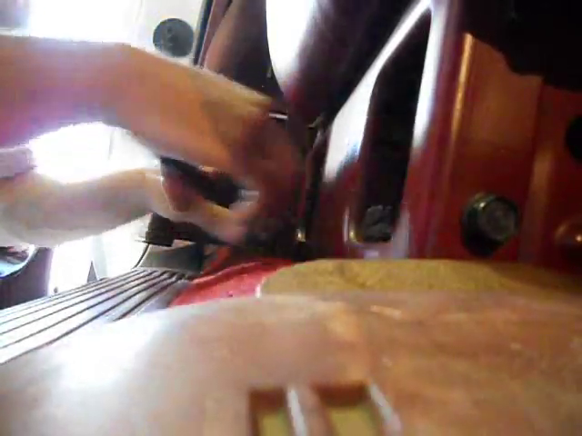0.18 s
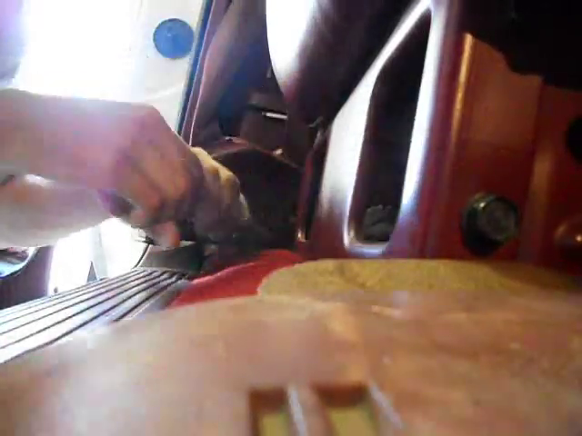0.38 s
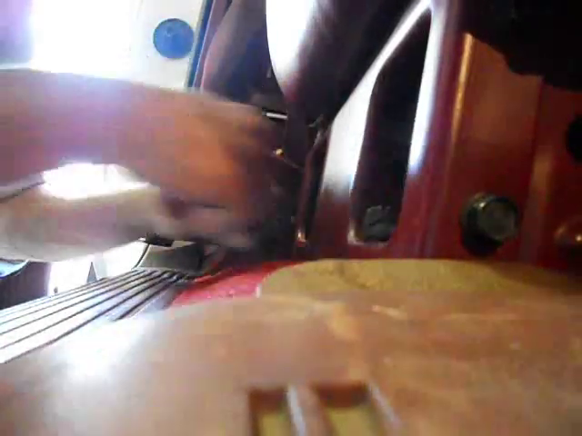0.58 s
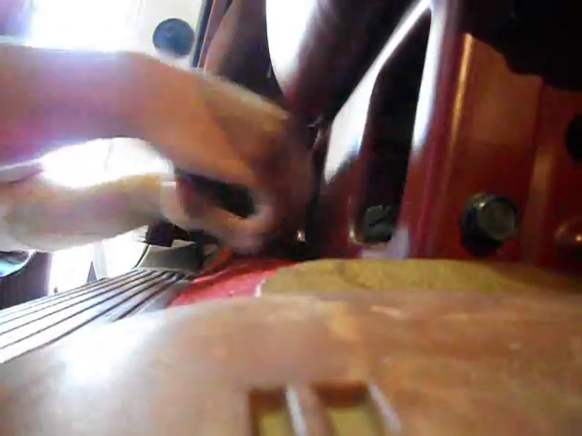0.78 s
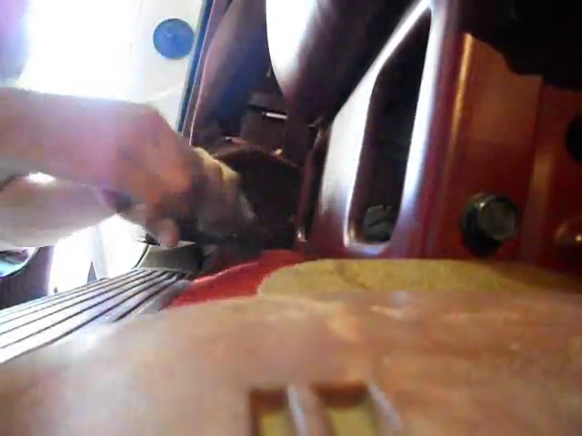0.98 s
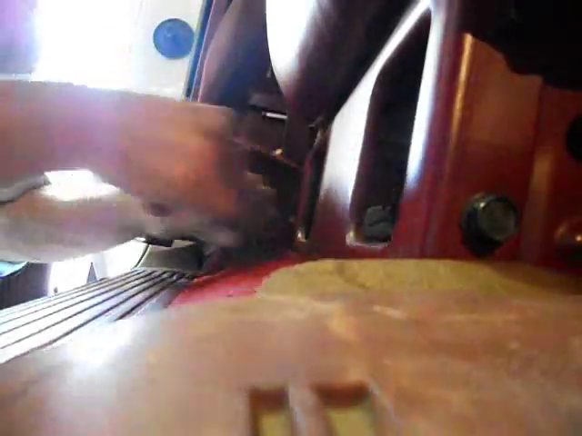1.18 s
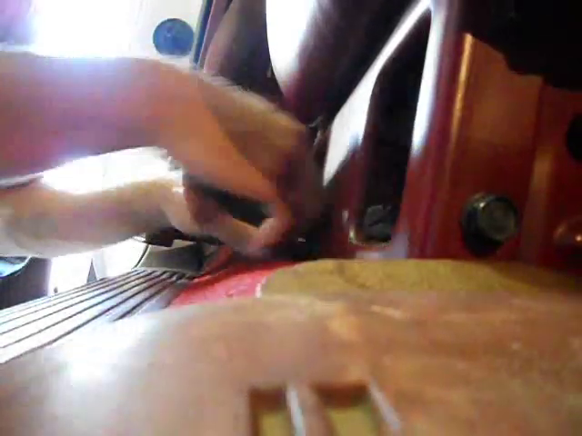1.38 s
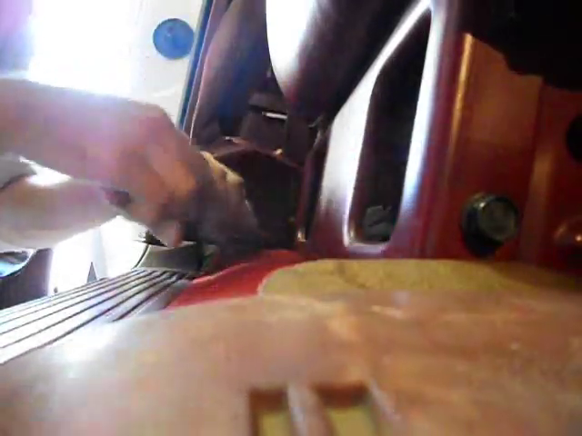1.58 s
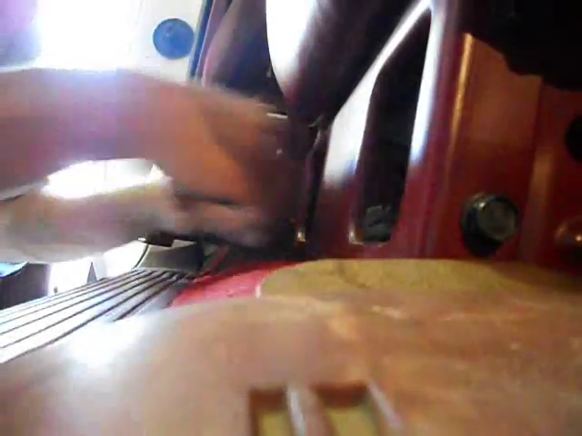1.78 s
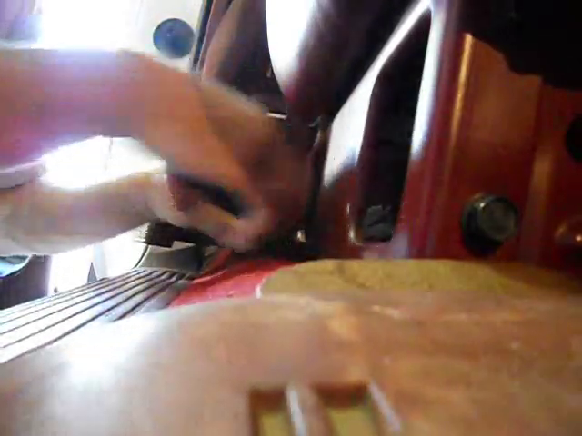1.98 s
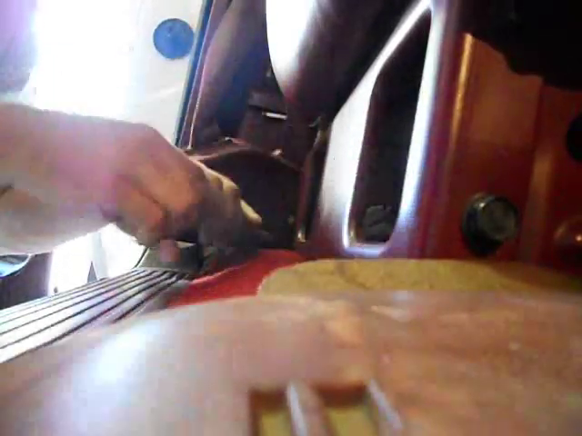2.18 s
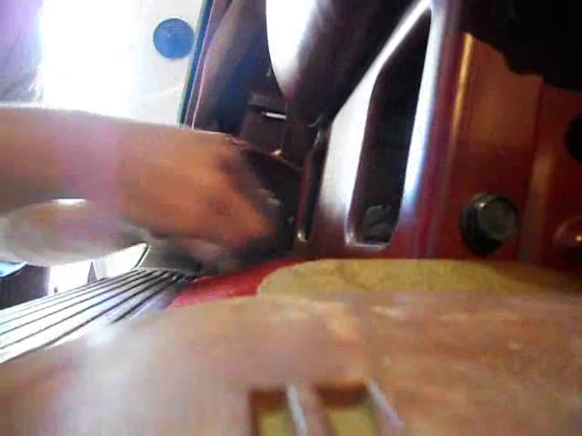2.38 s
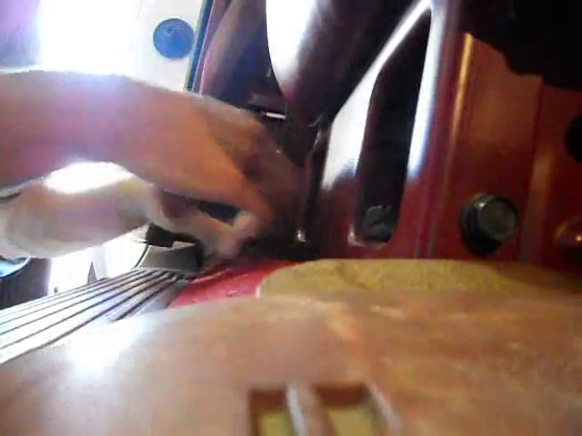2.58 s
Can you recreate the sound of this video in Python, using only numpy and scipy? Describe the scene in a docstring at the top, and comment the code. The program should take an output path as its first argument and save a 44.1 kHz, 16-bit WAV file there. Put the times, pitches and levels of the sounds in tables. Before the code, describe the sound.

Locking pliers wrench a rusty bolt in a vehicle, giving stuttering creaks, panel thuds and sharp clacks.

```python
"""Pliers on a rusted bolt

Locking pliers turn a rusted bolt in short strokes inside a vehicle. The threads stick and slip: each slip
is rough contact noise that shakes decaying panel and steel modes. The pliers clack as short noise bands,
rust grinds as a stream of tiny random impulses, and one dry scrape slides by as treble noise.
Camera hiss, a hum, two thin whines and a low rumble lie underneath.
"""
import sys
import numpy as np
from scipy import signal
from scipy.fft import rfft, irfft
from scipy.io import wavfile
from scipy.ndimage import uniform_filter1d

SR = 44100
rng = np.random.default_rng(int(sys.argv[2]) if len(sys.argv) > 2 else 0)


def persist_wave(psi):
    """Save psi, clipped to +-1, as 16-bit WAV."""
    counts = np.round(np.clip(psi, -1, 1) * 32767).astype(np.int16)
    wavfile.write(sys.argv[1], SR, np.atleast_2d(counts).T)


N = 114660  # length [samples]

# contact of one thread slip: fade time constant and rise [s]
SLIP_S, SLIP_RISE_S = 0.0024, 0.0022


def undb(db):
    """Turn dB into gain."""
    return 10 ** (np.asarray(db) / 20)


def unit(x):
    """Scale to rms 1."""
    return x / np.sqrt(np.mean(x ** 2))


def curve(table, column):
    """Join a table column by straight lines in time."""
    times = [row[0] for row in table]
    values = [row[column] for row in table]
    return np.interp(np.arange(N) / SR, times, values)


def add(out, start_s, x, peak_db):
    """Lay one blow into the track at its peak level."""
    start = int(start_s * SR)
    x = x[:N - start]
    out[start:start + len(x)] += x * undb(peak_db) / np.abs(x).max()


def coloured(gain):
    """Noise of rms 1, shaped by a gain for each frequency."""
    hz = np.maximum(np.arange(N // 2 + 1) * SR / N, 1.0)
    spectrum = rfft(rng.standard_normal(N)) * gain(hz)
    return unit(irfft(spectrum, N))


def burst(low_hz, high_hz, t60_s, rise_s=0, size=6000):
    """Densely packed, quickly damped modes, heard as a noise band that builds and dies away."""
    band = signal.butter(2, [low_hz, min(high_hz, 0.45 * SR)], "bandpass", fs=SR, output="sos")
    noise = unit(signal.sosfilt(band, rng.standard_normal(size)))
    t = np.arange(1, size + 1) / SR
    decay = np.exp(-np.log(1000) * t / t60_s)
    rise = t / np.maximum(t, rise_s)
    return noise * decay * rise


def chatter(length_s, rise_s=1e-5, push_s=0, size=3000):
    """Rough contact: spiky noise builds to a jolt and fades; a soft contact smooths it."""
    t = np.arange(size) / SR
    spikes = rng.standard_normal(size) ** 3
    contact = 0.16 * spikes * np.exp(-t / length_s) * np.minimum(t / rise_s, 1)
    contact[int(rise_s * SR)] = 1  # the jolt
    if push_s:
        contact = signal.lfilter([1], [1, -np.exp(-1 / (push_s * SR))], contact)
    return contact


def ring(modes, favour_hz=None, size=6000):
    """One blow's answer: decaying sines, each a little detuned and uneven."""
    scatter_db, detune = 1, 0.015  # spread of level [dB] and of pitch [fraction]
    favour_db, favour_oct = 8, 0.88  # boost [dB] around the favoured pitch and its reach [octaves]
    hz, db, t60_s = np.array(modes).T
    chance = rng.standard_normal((3, len(hz)))
    db = db + scatter_db * chance[0]
    if favour_hz:
        db = db + favour_db * np.exp(-(np.log2(hz / favour_hz) / favour_oct) ** 2)
    t = np.arange(size)[:, None] / SR
    sines = np.sin(2 * np.pi * hz * (1 + detune * chance[1]) * t)
    waves = sines * 1000.0 ** (-t / t60_s)
    return waves @ (undb(db) * np.sign(chance[2]))  # random polarity


def panel(contact, favour_hz=None):
    """A contact shakes the panel's clear modes and its denser band of damped ones."""
    # clear modes of the body panel: (pitch [Hz], relative level [dB], t60 [s])
    panel_modes = [(167, -13.5, 0.095), (202.4, -3.5, 0.082), (238.8, 0, 0.036), (328, -3.5, 0.025),
                   (462.7, -1.5, 0.041), (601, 1.5, 0.034), (663, 2, 0.012), (776, 2, 0.018),
                   (953, -3.5, 0.029), (1190, -11.5, 0.032), (1293, -11, 0.045), (1570, -28, 0.013)]
    dense_db = -7.5
    clear = ring(panel_modes, favour_hz)
    dense = burst(480, 1190, t60_s=0.046) * undb(dense_db) * np.abs(clear).max() / 2
    return signal.fftconvolve(contact, clear + dense)


def steel(length_s, rise_s=1e-4):
    """Contact rattles a few clear steel modes, over a dense damped band."""
    # clear modes of the steel: (pitch [Hz], relative level [dB], t60 [s])
    steel_modes = [(2250, -2.5, 0.03), (4350, 8, 0.038), (5850, -9.5, .04)]
    band_db = -1.5
    clear = signal.fftconvolve(chatter(length_s, rise_s), ring(steel_modes))
    band = burst(1050, 5360, t60_s=0.057, rise_s=rise_s, size=len(clear))
    return clear / np.abs(clear).max() + undb(band_db) * band


def dull(x):
    """Rust softens the treble of a contact: a gentle low-pass."""
    rust_hz = 3080
    return signal.lfilter(*signal.butter(2, rust_hz, fs=SR), x)


def tone(hz):
    """A sine of rms 1."""
    return np.sqrt(2) * np.sin(2 * np.pi * hz * np.arange(N) / SR)


def rumble():
    """Low rumble through the body: a narrow band of noise that swells and sinks."""
    # rumble loudness: (time [s], level [dB])
    rumble_level = [(0, -56.5), (.45, -45), (.75, -56.5), (1.2, -65.5), (1.35, -48.5), (1.9, -43),
                    (2.6, -63.5)]
    centre_hz, width_hz = 49, 39
    noise = coloured(lambda f: np.exp(-((f - centre_hz) / width_hz) ** 2))
    return undb(curve(rumble_level, 1)) * noise


def background():
    """Camera hiss with thin whines and a hum, sinking after loud clacks, plus low rumble."""
    # hiss colour: (frequency [Hz], relative density [dB per Hz])
    hiss_colour = [(70, -32.5), (110, -6.5), (250, -9.5), (600, -18.5), (2000, -21.5), (7700, -26.5),
                   (15900, -33)]
    # thin whines: (pitch [Hz], level relative to the hiss [dB])
    whines = [(7854, -12.5), (14169, -14)]
    # moving levels: (time [s], hiss level [dB], hum level [dB])
    levels = [(0, -47.5, -48.5), (.632, -45.5, -45.5), (.645, -49.5, -77), (.9, -58, -60),
              (1.27, -58, -63.5), (1.45, -49, -49), (1.85, -45, -46), (1.9, -48.5, -56), (2.6, -54.5, -57)]
    hum_hz = 406
    hz, db = np.array(hiss_colour).T
    hiss = coloured(lambda f: undb(np.interp(np.log(f), np.log(hz), db, left=-60)))
    for whine_hz, whine_db in whines:
        hiss = hiss + undb(whine_db) * tone(whine_hz)
    hum = undb(curve(levels, 2)) * tone(hum_hz)
    return undb(curve(levels, 1)) * hiss + hum + rumble()


def scrape():
    """A breathy metal-on-metal slide: a noise peak over broad treble."""
    start_peak_end_s = (1.626, 1.753, 1.76)
    level_db, centre_hz, width_hz = -38, 4760, 500

    def colour(f):
        peak = 1 / (1 + ((f - centre_hz) / width_hz) ** 2)
        low_cut = 1 / (1 + (3500 / f) ** 6)
        return (peak + 0.14) * low_cut

    swell = np.interp(np.arange(N) / SR, start_peak_end_s, [0, 1, 0])
    return undb(level_db) * swell * coloured(colour)


def grind():
    """Rust grinds between the big slips: dense tiny slips of uneven size shake panel and steel."""
    # grinding loudness: (time [s], level [dB])
    grind_level = [(.18, -55), (.25, -19), (.42, -40.5), (.55, -54.5), (.8, -57), (.87, -34), (1.0, -38),
                   (1.1, -58.5), (1.42, -89.5), (1.5, -25.5), (1.66, -42.5), (1.76, -51), (1.79, -37.5),
                   (1.85, -35.5), (1.97, -58), (2.05, -26), (2.17, -52.5), (2.4, -56)]
    grains_per_s, spread_db, steel_db = 820, 2.5, -20
    hits = rng.random(N) < grains_per_s / SR
    sizes = undb(spread_db * rng.exponential(size=N)) * rng.standard_normal(N)
    grains = hits * sizes
    # even out the local loudness, so that the level curve alone shapes it
    grains = grains / np.sqrt(uniform_filter1d(grains ** 2, size=4000) + 1e-9)
    in_panel = unit(panel(grains)[:N])
    in_steel = unit(signal.fftconvolve(grains, dull(steel(SLIP_S)))[:N])
    return undb(curve(grind_level, 1)) * (in_panel + undb(steel_db) * in_steel)


def clacks():
    """Hard knocks of the pliers: a ringing bite, steel, jaw treble and a panel thud."""
    # knocks: (time [s], bite peak [dB], top treble over it [dB], panel thud over it [dB], bite pitch [Hz])
    knocks = [(0.285, -13.5, -14.5, -29, 2900), (0.632, 2, -7.5, 0, 3920), (1.3024, -34.5, -6, 11.5, 4960),
              (1.325, -20.5, -5.5, 1.5, 4210), (1.5018, -7, -28, 0, 4440), (1.5084, -31.5, 7.5, 11.5, 4830),
              (1.8605, -25, -5, -4, 4850), (1.8855, -4.5, 5.5, 0.5, 4140), (2.0131, -39, 3.5, 14.5, 4000),
              (2.3107, -24.5, -21, 0.5, 4100)]
    contact_s, rise_s = 0.00066, 0.001
    bite_ratio, bite_t60_s = 1.21, 0.019  # band edges as a ratio around the bite pitch, and its ring [s]
    steel_db = -5  # relative to the bite
    thud_hz = 1120  # hard knocks favour the higher panel modes
    out = np.zeros(N)
    for start_s, db, top_db, thud_db, bite_hz in knocks:
        bite = burst(bite_hz / bite_ratio, bite_hz * bite_ratio, bite_t60_s, rise_s)
        jaws = burst(6000, 15000, t60_s=0.025, rise_s=rise_s)
        add(out, start_s, bite, db)
        add(out, start_s, steel(contact_s), db + steel_db)
        add(out, start_s, jaws, db + top_db)
        add(out, start_s, panel(chatter(contact_s), thud_hz), db + thud_db)
    return out


def slips():
    """Each slip of the thread thuds in the panel and rings the rust-dulled steel."""
    # thread slips: (time [s], thud peak [dB], steel ring over the thud [dB], favoured panel pitch [Hz])
    thread_slips = [(0.203, -18, -17, 535), (0.212, -19.5, -36, 226), (0.228, -5.5, -29, 437),
                    (0.245, -22, -39, 564), (0.256, -1.5, -17.5, 700), (0.283, -7, -11, 555),
                    (0.301, -9.5, -12.5, 702), (0.319, -9.5, -15, 340), (0.34, -4, -16.5, 327),
                    (0.377, -19.5, -25, 567), (0.395, -7, -16, 516), (0.419, -12, -18, 570),
                    (0.502, -26, -44, 397), (0.818, -25.5, -15.5, 212), (0.858, -11, -16.5, 480),
                    (0.88, -21.5, -9, 230), (0.905, -23.5, -7.5, 645), (0.923, -17, -16, 227),
                    (0.937, -21, -20, 225), (0.962, -26, -11.5, 630), (0.993, -22.5, -20.5, 201),
                    (1.038, -24.5, -9.5, 454), (1.307, -20.5, -14, 670), (1.435, -25, -24, 210),
                    (1.454, -20.5, -33, 565), (1.474, -5, -16.5, 330), (1.486, -10.5, -18, 570),
                    (1.56, -7.5, -14.5, 237), (1.576, -23, -7.5, 404), (1.598, -13.5, -15, 247),
                    (1.637, -6, -13.5, 225), (1.688, -29, -24, 227), (1.776, -22.5, -48, 468),
                    (1.812, -22, -41, 380), (1.838, -13.5, -27, 730), (1.863, -10, -10.5, 174),
                    (1.867, -7.5, -12.5, 1100), (2.016, -14.5, -15.5, 577), (2.036, -17, -38, 526),
                    (2.046, -9, -24, 231), (2.07, -15, -8, 460), (2.081, -15, -11, 203),
                    (2.121, -12, -16, 600), (2.137, -19.5, -8.5, 634), (2.156, -12.5, -21, 550),
                    (2.163, -20.5, -32, 470), (2.202, -20, -32, 563), (2.232, -19.5, -50, 227),
                    (2.263, -32, -36, 211), (2.278, -21.5, -17, 233), (2.314, -14.5, -12.5, 214)]
    push_s = 0.00032  # softness of the contact
    out = np.zeros(N)
    for start_s, db, steel_db, favour_hz in thread_slips:
        thud = panel(chatter(SLIP_S, SLIP_RISE_S, push_s), favour_hz)
        add(out, start_s, thud, db)
        add(out, start_s, dull(steel(SLIP_S, SLIP_RISE_S)), db + steel_db)
    return out


def cabin(work):
    """The cabin's short dull tail: the work smeared by decaying band noise."""
    tail_db, t60_s, dull_hz = -21, 0.22, 2600
    tail = burst(100, dull_hz, t60_s, size=20000)
    tail = tail / np.sqrt(np.sum(tail ** 2))
    return undb(tail_db) * signal.fftconvolve(work, tail)[:N]


def scene():
    """The low-cut work and its cabin tail, with the scrape, over the background."""
    low_cut = signal.butter(4, 120.2, "highpass", fs=SR, output="sos")
    work = signal.sosfilt(low_cut, slips() + clacks() + grind())
    return (work + cabin(work) + scrape() + background())[None]


def record(dry):
    """The sound has a narrow dip near 11 kHz, peaks flattened beyond full scale, no treble above 15.7 kHz."""
    dip_hz, width_hz, dip_db = 11000, 450, -14
    full_scale, top_hz = 1.0, 15700
    f = np.arange(N // 2 + 1) * SR / N
    dip = undb(dip_db * np.exp(-((f - dip_hz) / width_hz) ** 2))
    wet = np.clip(irfft(rfft(dry) * dip, N), -full_scale, full_scale)
    top_cut = signal.ellip(10, 0.2, 70, top_hz, fs=SR, output="sos")
    return signal.sosfilt(top_cut, wet)


dry = scene()
out = record(dry)
persist_wave(out)
```